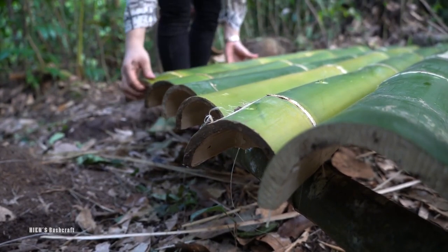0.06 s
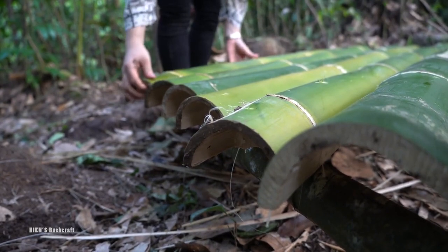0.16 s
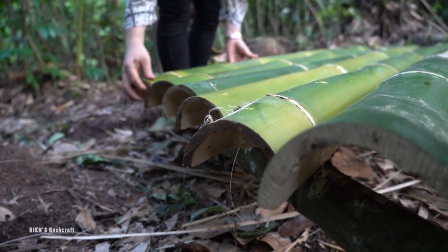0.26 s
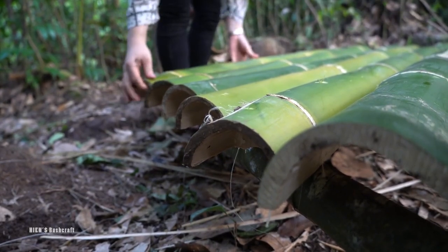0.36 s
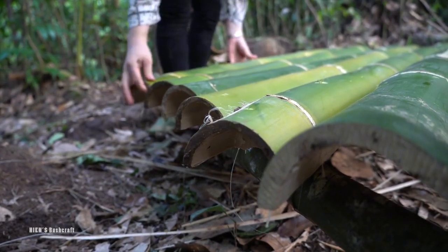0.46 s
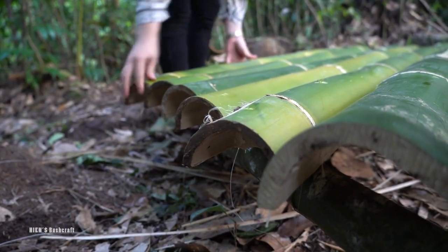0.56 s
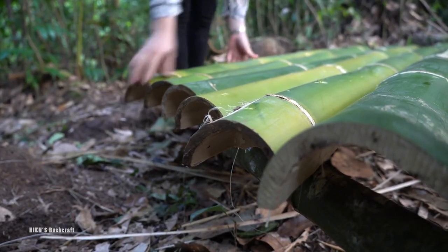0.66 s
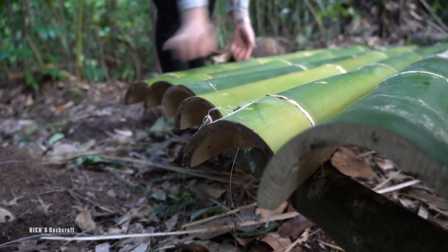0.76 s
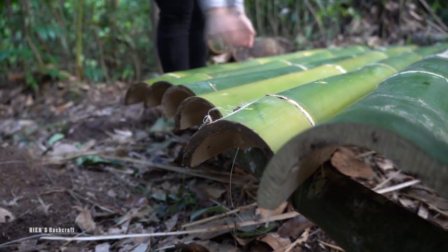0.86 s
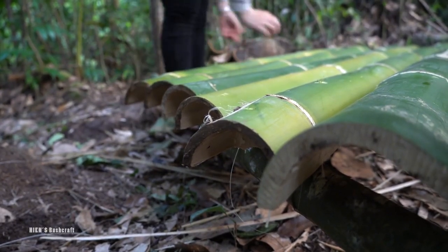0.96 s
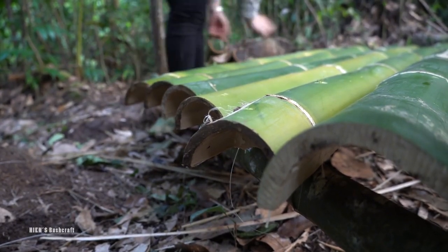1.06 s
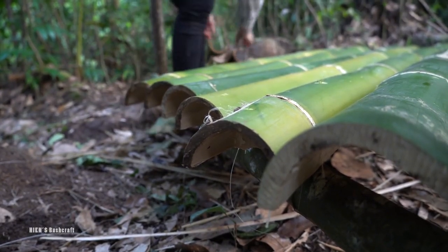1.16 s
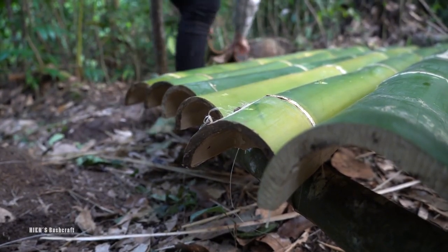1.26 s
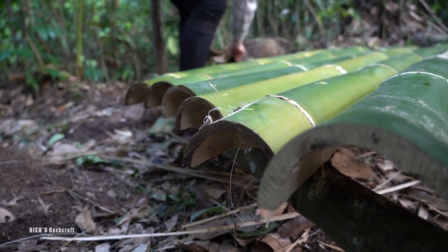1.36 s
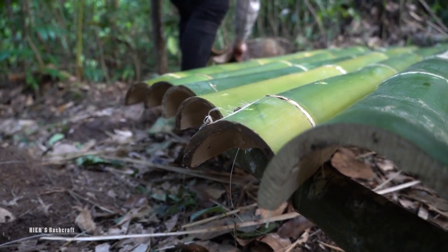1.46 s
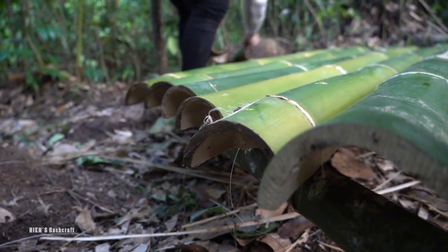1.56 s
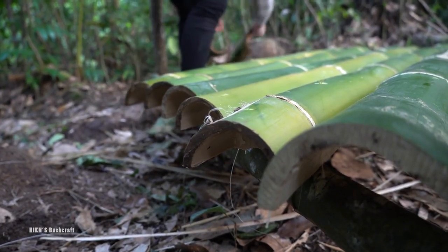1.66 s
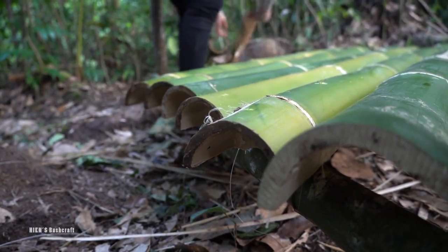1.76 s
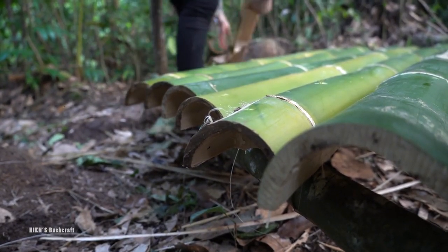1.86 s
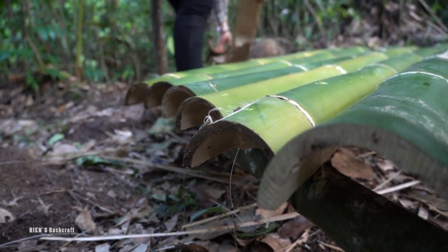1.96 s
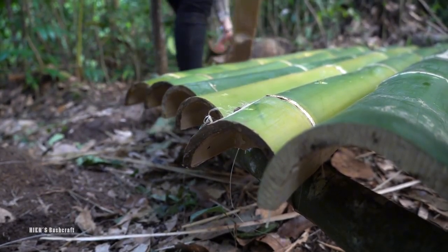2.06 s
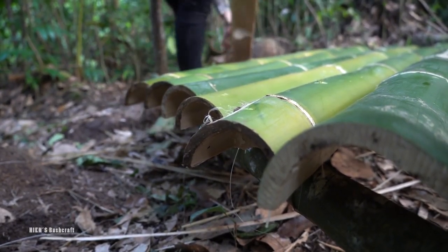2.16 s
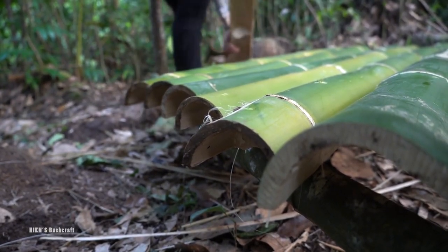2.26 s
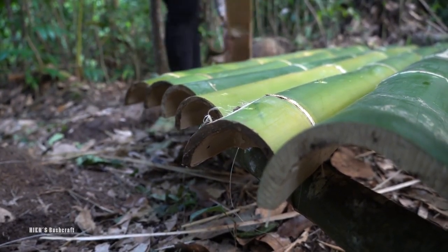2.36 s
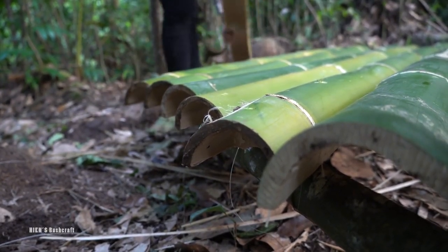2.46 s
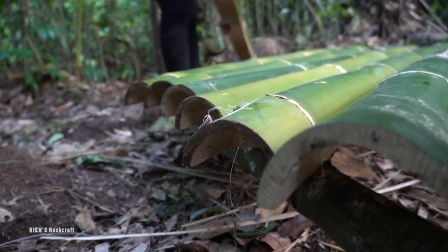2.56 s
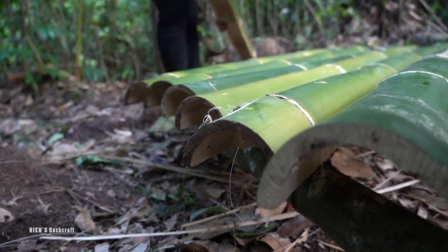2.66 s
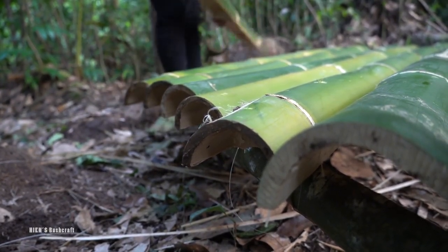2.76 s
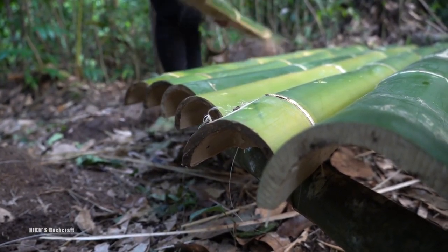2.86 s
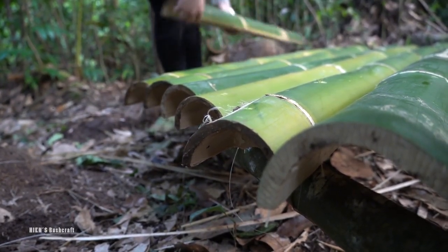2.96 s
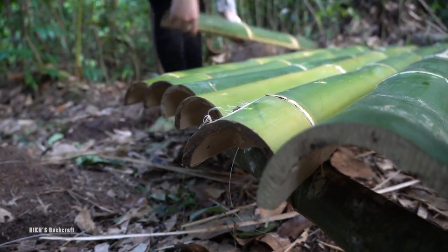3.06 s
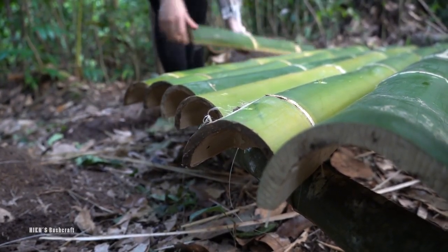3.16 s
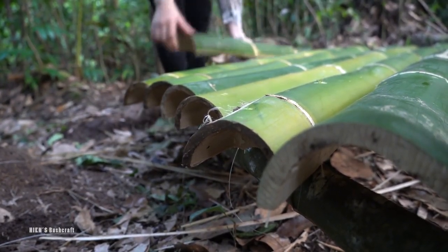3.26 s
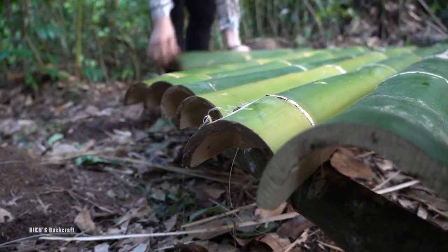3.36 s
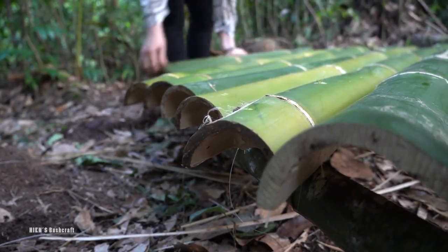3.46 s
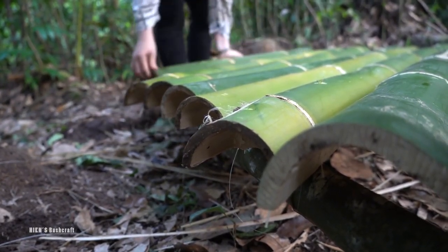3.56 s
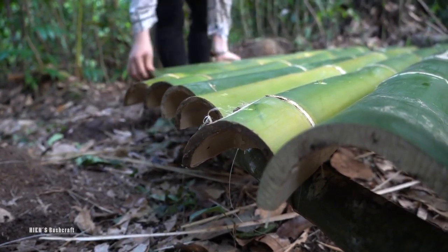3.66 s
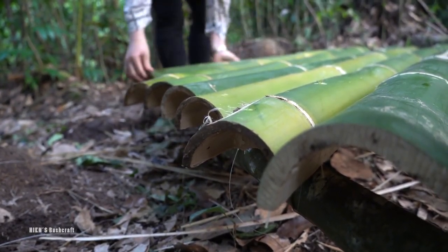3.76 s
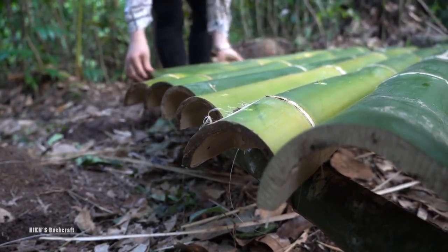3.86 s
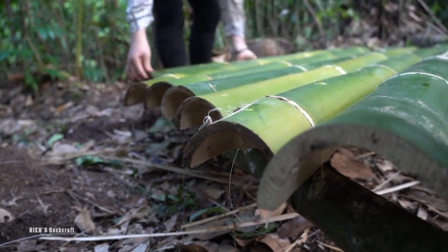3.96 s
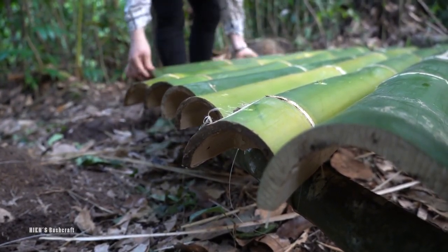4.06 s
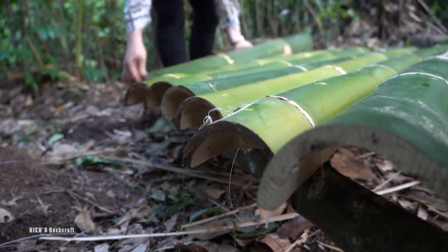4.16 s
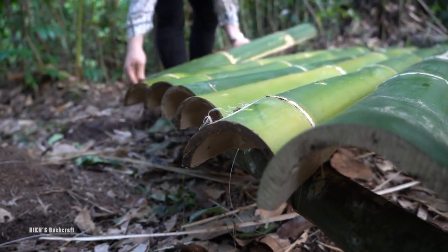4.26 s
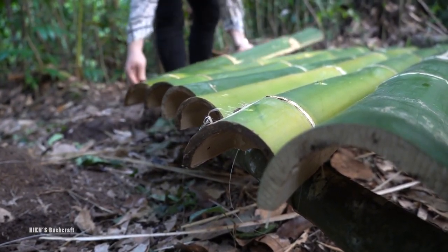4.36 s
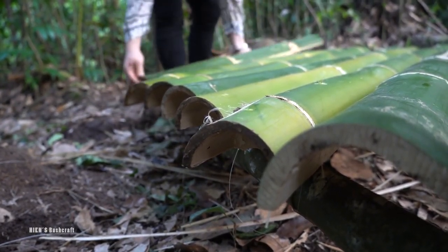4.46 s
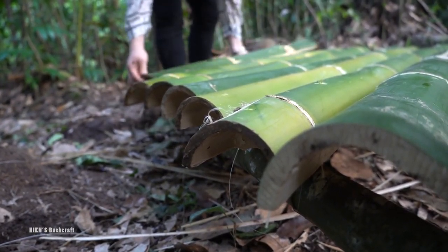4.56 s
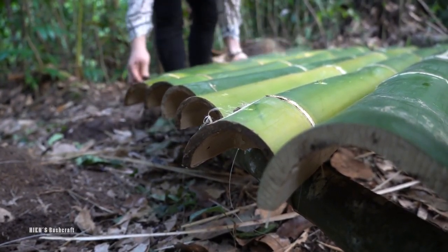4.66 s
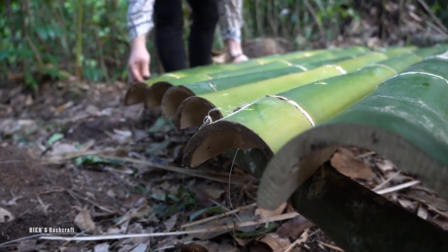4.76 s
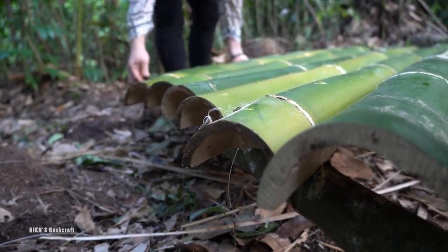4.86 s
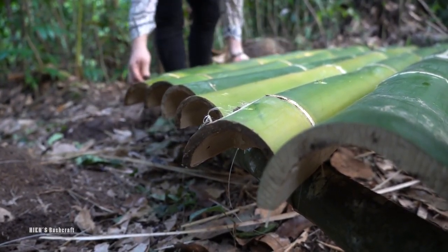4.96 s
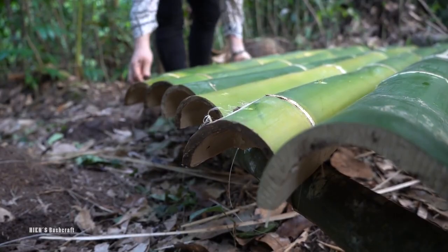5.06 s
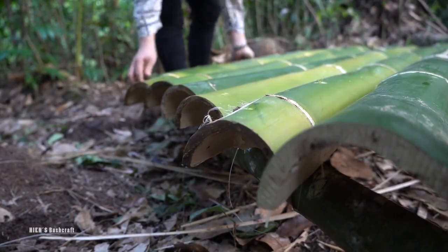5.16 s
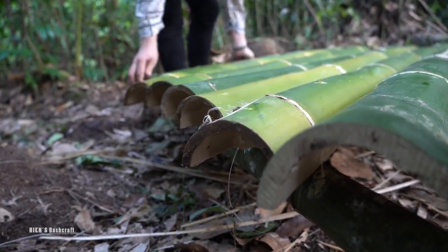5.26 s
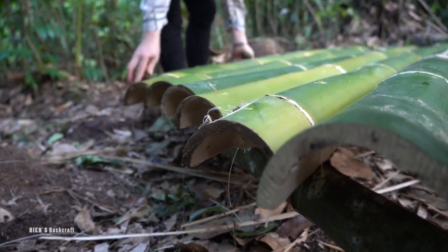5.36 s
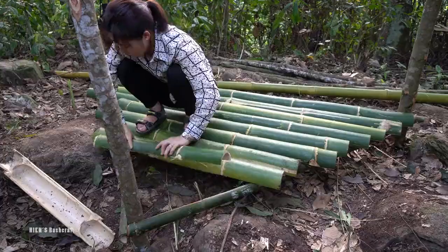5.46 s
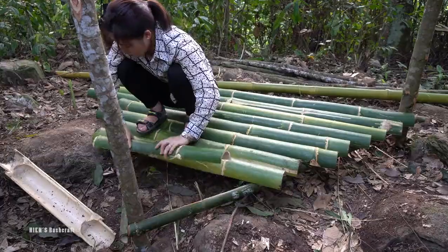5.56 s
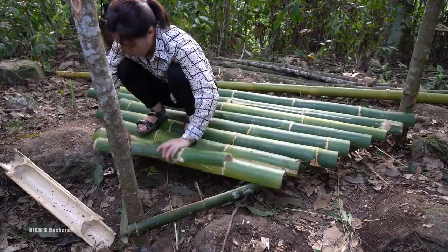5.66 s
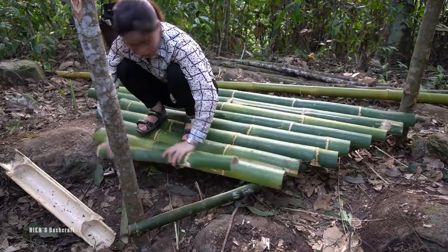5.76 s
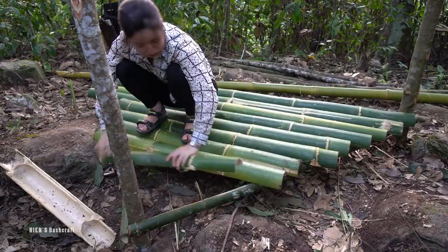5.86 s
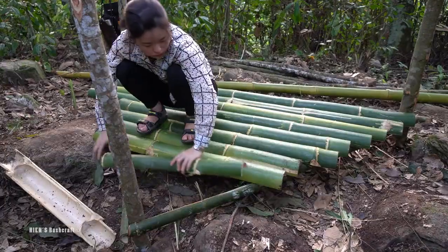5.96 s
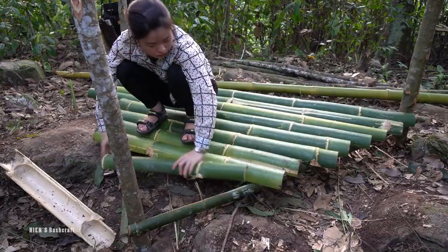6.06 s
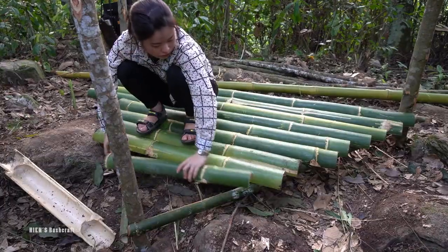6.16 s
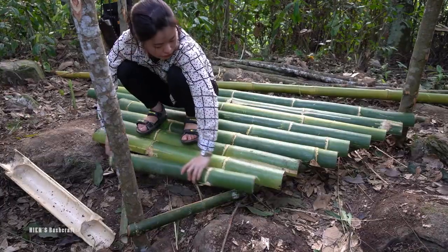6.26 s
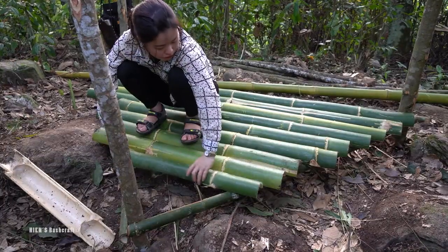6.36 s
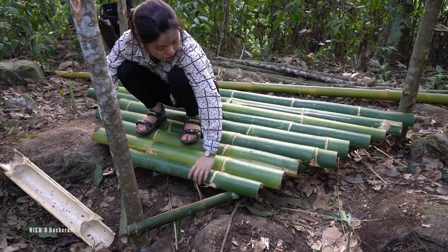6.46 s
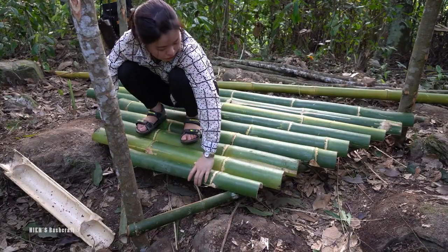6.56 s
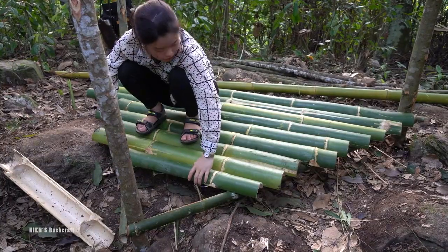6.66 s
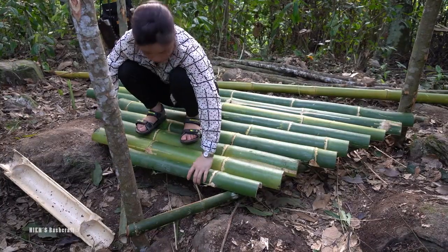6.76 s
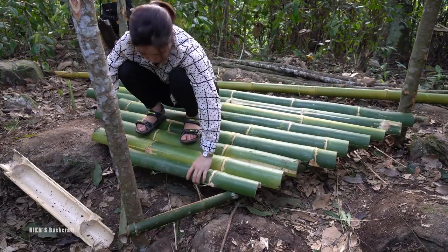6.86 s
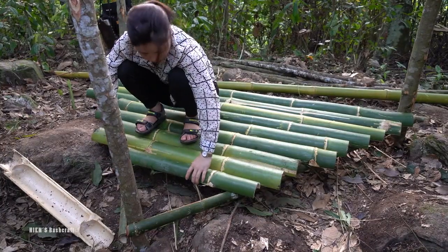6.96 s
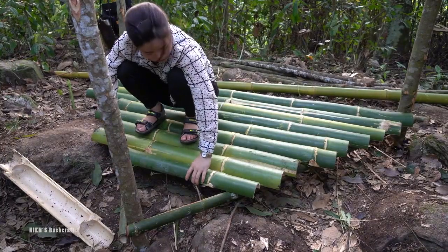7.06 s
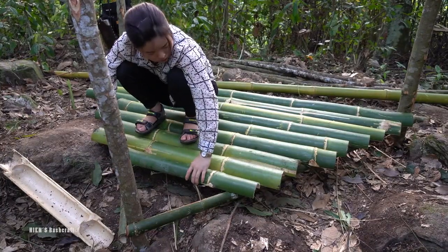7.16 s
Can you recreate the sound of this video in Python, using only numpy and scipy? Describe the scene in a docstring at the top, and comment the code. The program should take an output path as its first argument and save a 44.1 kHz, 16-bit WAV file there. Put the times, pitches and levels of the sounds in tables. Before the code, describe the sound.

Hollow bamboo is picked up, scraped lightly and dropped onto a row of similar pieces. Quiet ticks grow into brighter raps, then sharp resonant clunks with dull thumps through soil. After a quiet gap, a few more knocks follow. Close microphone in open forest, very short thin echoes at the sides, steady shrill insects and faint wind rumble.

```python
"""Split green bamboo halves are lifted, dragged and set down on a frame of poles in a forest, close and central.
Each blow is a short rattle of contacts that rings the hollow wood; dragging rubs the same wood and dry leaves.
Low thumps come through the soil, and thin echoes return from stems and leaves on both sides.
Insects drone in three bands all around over the far forest, and a light wind sways the microphone."""
import sys
import numpy as np
from scipy import signal
from scipy.fft import rfft, irfft
from scipy.io import wavfile
from scipy.ndimage import uniform_filter1d

SR = 44100
rng = np.random.default_rng(int(sys.argv[2]) if len(sys.argv) > 2 else 0)


def unload_wav(signal):
    """Save mono or channel-first audio to the path in sys.argv[1] as 16-bit WAV at rate SR, clipped to [-1, 1]."""
    wavfile.write(
        sys.argv[1],
        SR,
        np.round(np.clip(np.atleast_2d(signal).T, -1, 1) * 32767).astype(np.int16),
    )


N = 317501


def from_db(db):
    """Decibels to gain."""
    return 10 ** (np.asarray(db) / 20)


def rms_one(x):
    """Scales to rms 1."""
    return x / np.sqrt(np.mean(x ** 2) + 1e-20)


def in_time(rows):
    """Level column of a curve in time, one value per sample."""
    seconds, level = np.transpose(rows)
    return np.interp(np.arange(N) / SR, seconds, level)


def at_hz(points, hz):
    """Reads a spectrum on a log-frequency axis."""
    point_hz, value = np.transpose(points)
    return np.interp(np.log(hz), np.log(point_hz), value)


def drift(rate):
    """Slow random wander of rms 1, made at every 40th sample; a higher rate wanders faster."""
    r = np.exp(-80 * np.pi * rate / SR)
    noise = rng.standard_normal(N // 40 + 2002)
    slow = signal.lfilter([1], [1, -2 * r, r * r], noise)[2000:]   # without the filter's start-up
    return np.interp(np.arange(N) / 40, np.arange(len(slow)), rms_one(slow))


def resonance(x, hz, width_hz):
    """Two-pole resonance, gain 1 on top."""
    r = np.exp(-np.pi * width_hz / SR)
    poles = [1, -2 * r * np.cos(2 * np.pi * hz / SR), r * r]
    return signal.lfilter([(1 - r * r) / 2, 0, (r * r - 1) / 2], poles, x)


def highpass(x, order, hz):
    """Takes away what lies below hz."""
    return signal.sosfilt(signal.butter(order, hz, "high", fs=SR, output="sos"), x)


def spread(mid, side, alike):
    """Left and right from two signals, alike by the given share."""
    alike = np.clip(alike, 0, 1)
    return np.sqrt(1 + alike) * mid + np.sqrt(1 - alike) * side * [[1], [-1]]


def grains(per_s, uneven_db):
    """Random clicks of uneven size, two unrelated streams."""
    unevenness = np.minimum(rng.exponential(1, (2, N)), 5)
    sizes = from_db(uneven_db * unevenness) * rng.choice([-1, 1], (2, N))
    return sizes * (rng.random((2, N)) < per_s / SR) + 1e-18


def swells(start, length, level_db, rise_db_per_s, fall_db_per_s, rest_db):
    """Rise, hold and fall for each event over a resting level, powers added; gain per sample."""
    t = np.arange(0, N + 64, 64)[:, None] / SR
    before, after = np.maximum(start - t, 0), np.maximum(t - start - length, 0)
    db = level_db - rise_db_per_s * before - fall_db_per_s * after
    gain = np.sqrt(np.sum(from_db(db) ** 2, axis=1) + from_db(rest_db) ** 2)
    return np.interp(np.arange(N) / SR, t[:, 0], gain)


# Left-right likeness of the background noise, by frequency.
# Each row: frequency in Hz, left-right likeness as a share of 1.
LIKENESS = [(40, 0.93), (125, 0.71), (500, 0.89), (2000, 0.99), (4000, 0.35), (9000, .3), (13000, .5)]


def coloured(source, spectrum, patchy_db, alike=None):
    """Third-octave bands of a two-stream source, each with its own level and flicker; rms 1."""
    out, together = 0, drift(3)
    lowest, highest = spectrum[0][0], spectrum[-1][0]
    edges = lowest * 2 ** np.arange(0, np.log2(highest / lowest) + 1 / 3, 1 / 3)
    for k, (low, high) in enumerate(zip(edges, edges[1:])):
        band = signal.butter(2, [low, high], "band", fs=SR, output="sos")
        mid, side = signal.sosfilt(band, source) * (-1) ** k
        hz = np.sqrt(low * high)
        flicker_db = patchy_db * (.5 * together + drift(8.9))   # partly shared by all bands
        gain = from_db(at_hz(spectrum, hz) + flicker_db)
        out = out + gain * spread(mid, side, alike or at_hz(LIKENESS, hz))
    return rms_one(out)


# Colour of the forest far behind the bamboo.
# Each row: frequency in Hz, relative density in dB per Hz.
FOREST = [(24, -35), (40, 7.5), (156, 1.5), (447, -9), (687, -5.5), (956, -13), (1030, -7.5), (2300, -17),
          (4200, -27), (5460, -36), (9240, -120)]


def far_forest(level_db=-54):
    """Distant forest as patchy noise, its bands flickering at the microphone."""
    return from_db(level_db) * coloured(rng.standard_normal((2, N)), FOREST, patchy_db=3.5)


def far_leaves(gain_db=-66.5):
    """Even treble of leaves far off, nearly unrelated left and right."""
    mid, side = highpass(rng.standard_normal((2, N)), 2, 4000)
    return from_db(gain_db) * spread(mid, side, 0.043)


# Level of the insect chorus all around the microphone.
# Each row: time in seconds, level in dB.
CHORUS = [(0.0, -51), (1.66, -49), (2.22, -48), (2.95, -51.5), (4.11, -49.5), (6.98, -51), (7.2, -50)]
# Wing resonances of the insect crowds.
# Each row: frequency in Hz, width in Hz of each of two passes, relative level in dB,
# left-right likeness as a share of 1.
INSECTS = [(4965, 600, -4, 0.51), (5476, 146, -1, 0.58), (5674, 120, -4.5, 0.26), (5654, 440, 0.5, 0.38),
           (7270, 660, -9, 0.27), (7770, 450, -11.5, .2), (10000, 840, -12, 0.052),
           (10690, 1100, -9.5, 0.071)]


def insects(throb_db=1.87):
    """Crowds of wing clicks pass each resonance twice over; each crowd throbs independently."""
    clicks = [grains(5000, uneven_db=-0.5), grains(5000, uneven_db=-1.5)]
    out = 0
    for k, (hz, width_hz, db, alike) in enumerate(INSECTS):
        once = resonance(clicks[k % 2], hz, width_hz)
        mid, side = rms_one(resonance(once, hz, width_hz))
        out = out + from_db(db + throb_db * drift(5.3)) * spread(mid, side, alike)
    return from_db(in_time(CHORUS)) * rms_one(out)


# Wind sway right at the microphone.
# Each row: time in seconds, gain in dB before the random gusts.
WIND = [(0.0, -51), (0.26, -46), (0.72, -43.5), (0.76, -57), (0.82, -48), (1.78, -34.5), (1.9, -55),
        (2.11, -41), (2.83, -56.5), (2.95, -42), (3.13, -53), (3.19, -43), (4.27, -53.5), (4.31, -46.5),
        (5.49, -52.5), (5.55, -39.5), (5.85, -52), (7.2, -93)]


def wind(sway_hz=20.42, wander=0.063, lumps_db=-9, gust_db=3, gust_rate=3):
    """A slow, nearly regular sway of air pressure with lumps around it, mostly shared by left and right."""
    sway_rates = [sway_hz * (1 + wander * drift(4.5)) for stream in range(2)]
    turns = np.cumsum(sway_rates, axis=1) / SR
    lumps = rms_one(resonance(resonance(rng.standard_normal((2, N)), 24, 14), 24, 14))
    mid, side = np.sin(2 * np.pi * turns) + from_db(lumps_db) * lumps
    gusts = from_db(in_time(WIND) + gust_db * drift(gust_rate))
    return gusts * spread(mid, side, .8)


# Modes of a split half, close to the microphone.
# Each row: frequency in Hz, relative level in dB, decay to -60 dB in seconds before the contact scales it.
BAMBOO = [(115, -22, .09), (194, -0.5, 0.042), (285.6, -2, 0.13), (319.7, 4, 0.11), (425.3, 1.5, 0.19),
          (503.6, -1.5, 0.12), (602, 0, 0.14), (662, 3.5, 0.078), (718, 1.5, 0.038), (831, 1.5, 0.11),
          (901, -2.5, 0.076), (1038, 1, 0.18), (1079, -4, 0.037), (1250.5, 6.5, 0.082), (1375, -6, 0.077),
          (1440, 3, 0.087), (1642, 2, 0.05), (1663, 7.5, 0.089), (2143, 8.5, 0.066), (2000, -9, 0.015),
          (2283, 2.5, 0.044), (2486, 3.5, 0.081), (2787, 3, 0.096), (3170, 3, 0.079), (3540, 0.5, 0.05),
          (3862, 0.5, 0.097), (4270, 2, 0.046), (5050, 10, 0.0048), (5720, 0, 0.017), (6790, -6.5, 0.02)]
# Drags and shuffles of wood over wood and litter, close and central.
# Each row: start in seconds, length in seconds, rub level in dB, its treble in dB against the rub,
# leaf level in dB.
STROKES = [(0, 0.068, -55, 3.5, -56), (0.437, 0.018, -63, -9, -57), (0.573, 0.13, -52.5, -21, -74),
           (0.748, 0.014, -50, -3, -64), (0.885, 0.087, -53, -5.5, -61), (1.54, 0.096, -55.5, -2.5, -63),
           (1.716, 0.043, -52, -3, -50.5), (1.863, 0.02, -53, 2, -48.5), (1.977, 0.1, -46, -0.5, -49.5),
           (2.114, 0.1, -51.5, 1, -53.5), (2.273, 0.077, -44.5, -3.5, -47), (2.464, 0.031, -52, 1, -52),
           (2.543, 0.041, -59, 1, -63), (2.62, 0.03, -53.5, 8, -49), (2.698, 0.048, -63, 9.5, -51),
           (2.79, 0.036, -72, 6, -58), (3.217, 0.035, -63, -3, -57), (3.412, 0.064, -34, -12.5, -54),
           (3.553, 0.18, -58, 7.5, -57.5), (3.741, 0.069, -42, 0, -44.5), (4.039, 0.023, -69, 10, -50),
           (4.166, 0.036, -48.5, -2.5, -57.5), (4.51, 0.14, -54, -6, -70), (4.68, 0.073, -41.5, -12.5, -56),
           (4.773, 0.087, -46, -1, -63), (5.966, 0.12, -56, -11, -63), (6.438, .05, -58, -2, -66),
           (6.5, 0.048, -66, -4, -49), (6.71, 0.018, -75, 5, -62)]
STROKE_RISE_DB_PER_S, STROKE_FALL_DB_PER_S = 209, 256


def rubbing(shake_db=-27, shake_s=0.028, shake_fall_db_per_s=297, shake_treble_db=-11):
    """Dense slips along the skin keep the modes murmuring; each stroke sets its share of upper modes."""
    slips = grains(1500 * from_db(2.6 * drift(22)), uneven_db=2.0)[0]
    rings = [(-1) ** k * from_db(db) * resonance(slips, hz, 6.4 / t60)
             for k, (hz, db, t60) in enumerate(BAMBOO)]
    lower, upper = rms_one(sum(rings[1:13])), rms_one(sum(rings[13:25]))
    start, length, rub_db, treble_db, _ = np.transpose(STROKES)
    rise, fall = STROKE_RISE_DB_PER_S, STROKE_FALL_DB_PER_S
    # the resting levels are small movements between strokes
    low_drag = swells(start, length, rub_db, rise, fall, rest_db=-66)
    high_drag = swells(start, length, rub_db + treble_db, rise, fall, rest_db=-71.5)
    # after a blow the row rubs on its frame
    blow_s, height_db = np.transpose(BLOWS)[:2]
    shake = swells(blow_s, shake_s, height_db + shake_db, 1e4, shake_fall_db_per_s, -120)
    low_gain = np.hypot(low_drag, shake)
    high_gain = np.hypot(high_drag, from_db(shake_treble_db) * shake)
    return low_gain * lower + high_gain * upper


# Colour of the dry litter close under the bamboo.
# Each row: frequency in Hz, relative density in dB per Hz.
LEAVES = [(880, -10), (1500, 0), (1700, -19), (2600, -3), (2850, -7), (4200, -2), (5510, -5.5),
          (6250, -6.5), (10900, -18), (13000, -22)]


def leaves():
    """Dry litter crackles as random clicks under every stroke, and faintly in between."""
    start, length, *_, leaves_db = np.transpose(STROKES)
    stir = swells(start, length, leaves_db, STROKE_RISE_DB_PER_S, STROKE_FALL_DB_PER_S, rest_db=-63.5)
    return stir * coloured(grains(3000, uneven_db=1.5), LEAVES, patchy_db=0.0, alike=1.0)


# Dull thuds through the soil, under steps and heavy blows near the microphone.
# Each row: start in seconds, level in dB before the swell and fall, frequency in Hz.
THUMPS = [(0.062, -40.5, 111), (0.556, -34, 128), (0.706, -40.5, 105), (2.932, -36, 107.5),
          (3.203, -32.5, 94), (3.331, -33, 105), (3.42, -23, 132.5), (3.757, -32.5, 117), (4.38, -41, 91),
          (4.756, -33, 113)]


def thumps(t60=0.21):
    """A low swell and fall through the ground."""
    t, out = np.arange(SR // 3) / SR, np.zeros(N + SR)
    for s, level_db, hz in THUMPS:
        swell_and_fall = from_db(-60 * t / t60) * (1 - np.exp(-t / 0.00074))
        push = np.sin(2 * np.pi * hz * t) * swell_and_fall
        out[round(s * SR):][:len(t)] += from_db(level_db) * push
    return out[:N]


def row_of_halves(count=7, detune=0.0752, scatter=0.013):
    """Every half has the same modes, tuned in steps apart: Hz, dB, t60 and 'not the middle half' as columns."""
    hz, db, t60 = np.repeat(np.transpose(BAMBOO), count, axis=1)[:, :, None]
    step = np.tile(np.linspace(-1, 1, count), len(BAMBOO))[:, None]
    others = step != 0
    tuning = 1 + detune * step + scatter * others * rng.uniform(-1.04, 1, hz.shape)
    return hz * tuning, db, t60, others


def evened(rattle, size=25):
    """Keeps the timing of a rattle but spreads its energy evenly over pitch."""
    spectrum = rfft(rattle, 2 * len(rattle))
    smooth = np.sqrt(uniform_filter1d(np.abs(spectrum) ** 2, size=size))
    return irfft(spectrum / smooth)[:len(rattle)] * np.sqrt(np.sum(rattle ** 2))


# Blows on the bamboo, close and central.
# Each row: start in seconds, height in dB, favoured pitch in Hz, favour in dB, treble in dB,
# rattle decay time in seconds.
BLOWS = [(.068, -32.5, 367, 12, -13, 0.0048), (0.432, -38.5, 985, 12.5, -12, .0027),
         (0.554, -23.5, 490, 1.5, -36, .005), (0.585, -35, 450, 18, -12, 0.0017),
         (0.656, -34.5, 634, 1, -20, 0.0013), (0.737, -39, 325, 11, -5, 0.0078),
         (0.913, -35.5, 304, 16, 1, 0.0038), (0.927, -45, 900, -3, -2, 0.0016),
         (0.985, -40, 720, 17, -1, 0.0018), (1.543, -38.5, 445, -2, -26, 0.027),
         (1.644, -42.5, 3020, 12, 13, .002), (1.691, -41, 560, 23, 7, 0.0074),
         (1.73, -38, 570, 14, 3, 0.0068), (1.999, -31, 1080, 12, 12, 0.006),
         (2.019, -35, 1140, 12, -10, 0.0059), (2.138, -36.5, 1720, 5, 5, 0.0084),
         (2.263, -30, 2180, 4, 9, 0.0085), (2.293, -29, 583, 12, 12.5, 0.0047),
         (2.336, -31.5, 1410, 0, 0, 0.0022), (2.466, -36.5, 1700, 9, 6, 0.0099),
         (2.534, -38.5, 1280, 14.5, 12, 0.03), (2.638, -30.5, 1330, 6, 3, 0.0052),
         (2.643, -17, 1320, 19, 4, 0.0016), (2.696, -28, 1300, 6, 7, 0.0051),
         (2.739, -30, 1280, 14, 5, 0.0084), (2.822, -45.5, 900, 14, 2, .002),
         (3.1894, -5, 2280, 12.5, -8, 0.00029), (3.193, -13, 900, 12, -8, 0.0087),
         (3.201, -8, 690, 12, -6, 0.0024), (3.209, -10.5, 433, -16, -7, 0.0041),
         (3.225, -14, 410, 10, -38, 0.0055), (3.25, -20.5, 436, 27, -42, 0.00083),
         (3.319, -11, 517, 6, -19, 0.0032), (3.325, -10.5, 800, 9, -14, 0.0047),
         (3.379, -25, 334, 23, -44, 0.0078), (3.409, -15, 330, 19.5, -16.5, 0.0035),
         (3.429, -14, 300, 16, -49, 0.0029), (3.448, -25.5, 322, 1, -23, 0.011),
         (3.489, -21, 385, 3, -11, 0.0016), (3.717, -31.5, 844, 6, -4, 0.081),
         (3.759, -9.5, 1200, -2, -2.5, 0.0027), (3.783, -22.5, 330, 5, -15, 0.016),
         (3.839, -24.5, 595, 4.5, -28, 0.0059), (4.384, -16, 514, 6, -21, 0.0042),
         (4.418, -29.5, 332, 17, -21, 0.0022), (4.438, -23.5, 600, 6, -34, 0.0084),
         (4.531, -38.5, 324, 13, -18, 0.016), (4.64, -22, 510, 13, -17.5, 0.0025),
         (4.71, -31.5, 923, 11, -5, 0.0069), (4.754, -7, 433, 5, -18, 0.0024),
         (4.762, -9.5, 635, 9.5, -25, 0.0043), (4.775, -4.5, 680, 4.5, -18.5, 0.0033),
         (4.793, -19, 440, -2, -8, 0.0052), (4.804, -9, 1290, 7.5, -8, 0.0037),
         (4.824, -15, 523, 15, -27, 0.0075), (4.849, -16.5, 387, 2.5, -31, .008),
         (4.861, -21, 435, 16.5, -14, 0.0025), (5.992, -22, 1550, 14, -19.5, 0.00092),
         (6.001, -23.5, 370, 8, -43, 0.0046), (6.226, -39, 347, 12, -18, 0.012),
         (6.494, -13, 1100, -1, -24, 0.009), (6.5, -8, 593, 15, -11, 0.0019),
         (6.509, -16, 560, -19, -35, .002), (6.525, -24.5, 340, -16, -17, 0.0065),
         (6.534, -22.5, 1660, 13.5, 22, 0.002), (6.541, -23.5, 325, 9, -16, 0.0059),
         (7.127, -34.5, 296, 7, -35, 0.0065)]
# Between these times one half is held clear of the row: it rings longer on a clearer pitch,
# and the other halves hardly answer.
ALOFT_START_S, ALOFT_END_S = 2.44, 2.8
ALOFT_RING, ALOFT_OCTAVES, ROW_SILENT_DB = 1.1, 0.14, -17
# Ring time against the table after a 4 ms rattle; a looser, longer rattle damps less.
RING_SHARE, RING_GROWTH = .55, 0.32


def blows(favour_octaves=0.18, shelf_hz=1500, crack_db=-12, rise_s=0.0003, first_db=12, hard_part=0.64,
          settle_db=-15, settle_s=0.023):
    """A dying rattle strikes every mode; where it lands favours one pitch, hardness sets the treble."""
    hz, mode_db, t60, others = row_of_halves()
    t, out = np.arange(SR // 8) / SR, np.zeros(N + SR)
    swing = np.sin(2 * np.pi * hz * t)
    hard_share = 1 / (1 + (shelf_hz / hz) ** 4)
    for s, height_db, pitch_hz, favour_db, treble_db, length in BLOWS:
        aloft = ALOFT_START_S < s < ALOFT_END_S
        ring = RING_SHARE * (max(length, 1e-4) / .004) ** RING_GROWTH * (ALOFT_RING if aloft else 1)
        signs, noise = rng.choice([-1, 1], hz.shape), rng.standard_normal(len(t))
        octaves_off = np.log2(hz / pitch_hz)
        near = np.exp(-.5 * (octaves_off / (ALOFT_OCTAVES if aloft else favour_octaves)) ** 2)
        strength_db = mode_db + hard_share * treble_db + favour_db * near + aloft * others * ROW_SILENT_DB
        modes = signs * from_db(strength_db) * swing * from_db(-60 * t / (t60 * max(ring, .1)))
        low = np.sum((1 - hard_share) * modes, axis=0)
        high = np.sum(hard_share * modes, axis=0)
        # the bare click of the contact
        click = np.array([0.44, .6, -0.18, -0.39])
        high[:4] += from_db(crack_db + treble_db) * len(hz) ** .5 * click
        # the loose row shivers on for a moment
        settle = from_db(settle_db) * min(1, length / 0.006) * np.exp(-t / settle_s)
        onset = 1 - np.exp(-t / min(rise_s, length))
        rattle = noise * (np.exp(-t / max(length, 1e-4)) + settle) * onset
        # mainly the early, hard contacts reach the treble
        sharp = noise * (np.exp(-t / max(hard_part * length, 1e-4)) + from_db(-7.5) * settle)
        sharp[0] = from_db(first_db)
        sound = signal.fftconvolve(low, evened(rattle)) + signal.fftconvolve(high, evened(sharp))
        height = np.sqrt(2 * uniform_filter1d(sound ** 2, size=200).max())   # over about 4 ms
        at = round(s * SR)
        out[at:at + len(sound)] += from_db(height_db) * sound / height
    return highpass(out[:N], 3, 150)   # the blows carry little below 150 Hz


def trunks(x, level_db=-17, t60=0.065):
    """Scattered thin echoes off stems and leaves, other ones on each side."""
    t = np.arange(SR // 4) / SR
    echoes = rng.standard_normal((2, len(t))) * from_db(-60 * t / t60) * (t > .003)
    echoes = highpass(echoes, 2, 1700)
    echoes = echoes / np.sqrt(np.sum(echoes ** 2, axis=1, keepdims=True))
    return from_db(level_db) * signal.fftconvolve(x[None], echoes, axes=1)[:, :N]


def scene():
    """All sources around the microphone, the near ones in the centre."""
    wood = blows() + rubbing() + thumps()
    aside_db = .12 * drift(4.9)   # the hands work a little left or right of centre
    near = wood * from_db([aside_db, -aside_db]) + trunks(wood) + leaves()
    return near + far_forest() + far_leaves() + insects() + wind()


def record(dry, dip_s=5.548, stop_hz=13600):
    """The level dips briefly once, peaks are rounded, and the top is cut."""
    dip = 1 - .7 * np.exp(-.5 * ((np.arange(N) / SR - dip_s) / .005) ** 2)
    rounded = 1.1 * np.tanh(dip * dry / 1.1)
    return signal.sosfilt(signal.cheby2(14, 60, stop_hz, fs=SR, output="sos"), rounded)


dry = scene()
out = record(dry)
unload_wav(out)
```